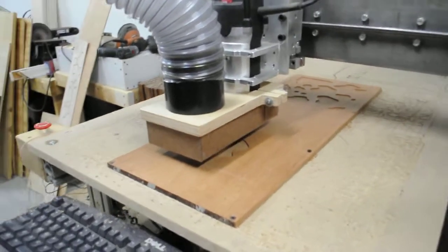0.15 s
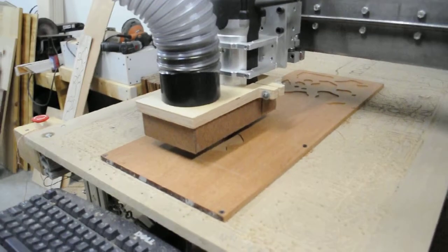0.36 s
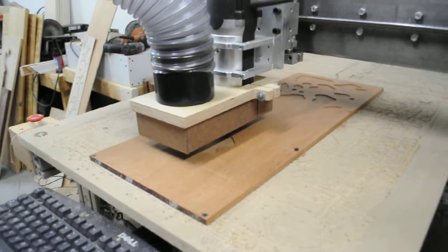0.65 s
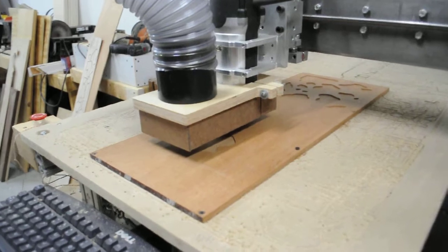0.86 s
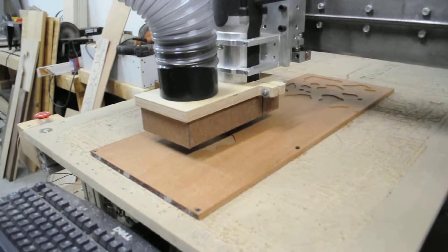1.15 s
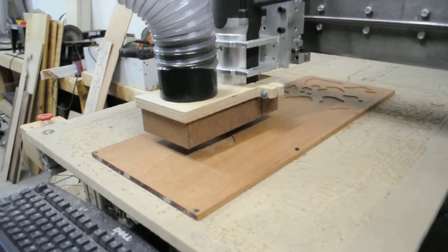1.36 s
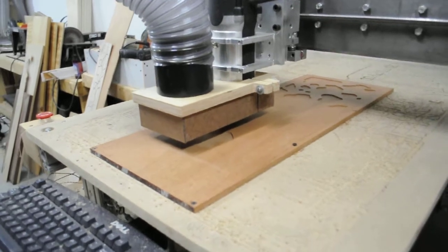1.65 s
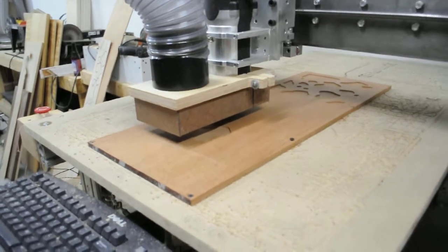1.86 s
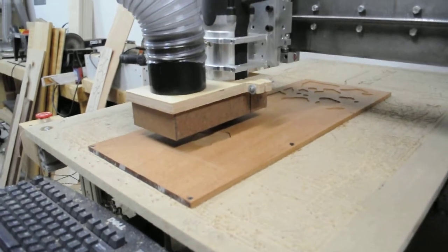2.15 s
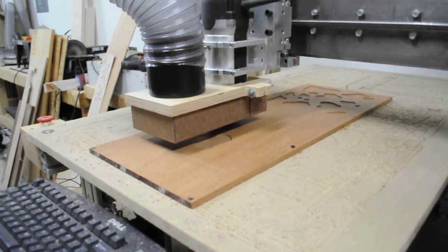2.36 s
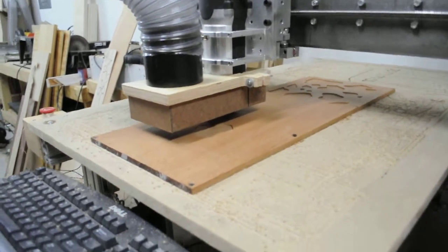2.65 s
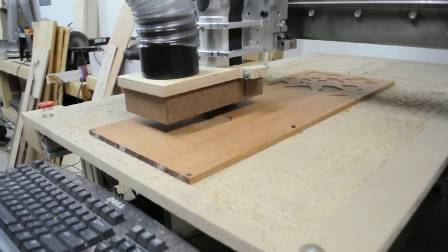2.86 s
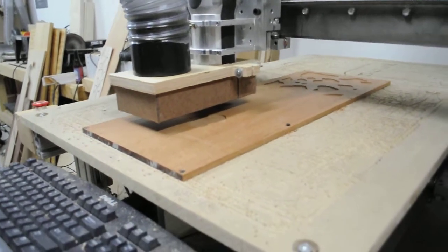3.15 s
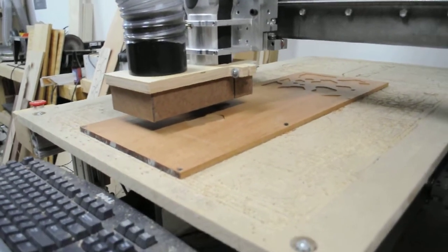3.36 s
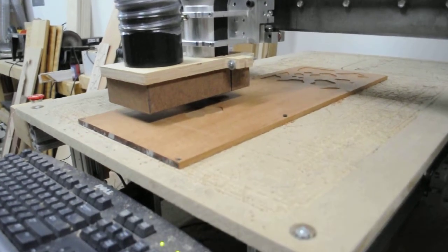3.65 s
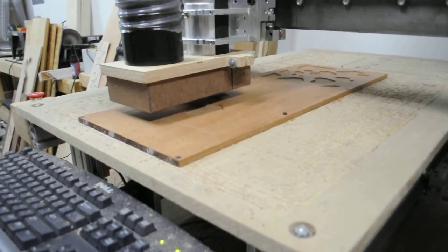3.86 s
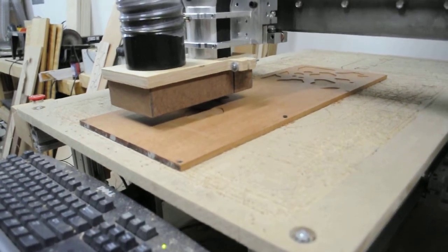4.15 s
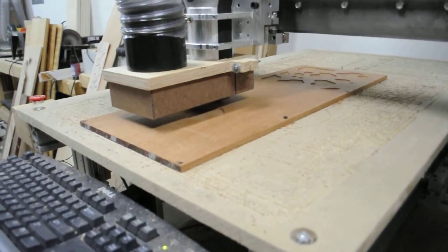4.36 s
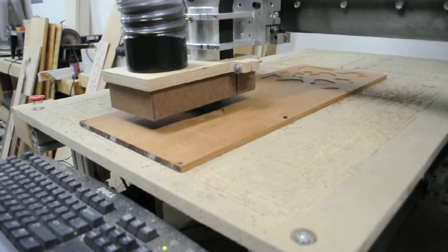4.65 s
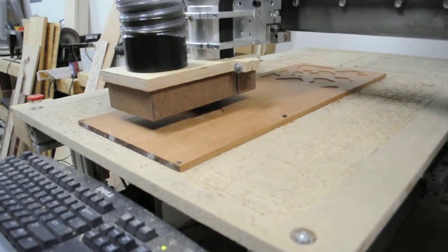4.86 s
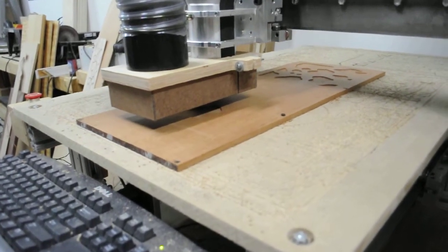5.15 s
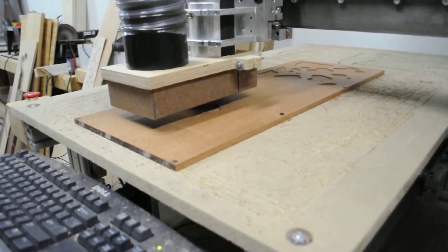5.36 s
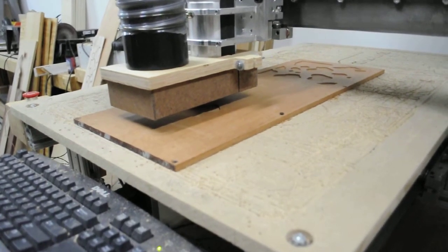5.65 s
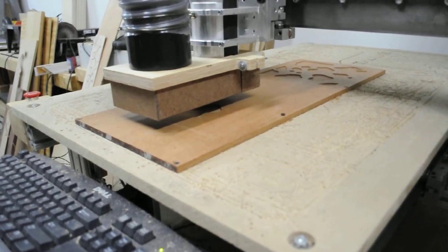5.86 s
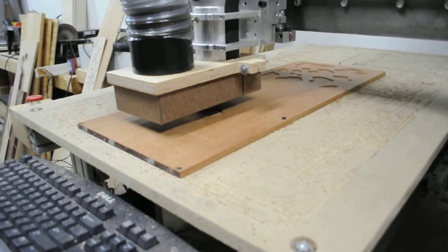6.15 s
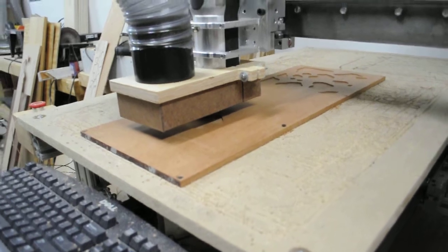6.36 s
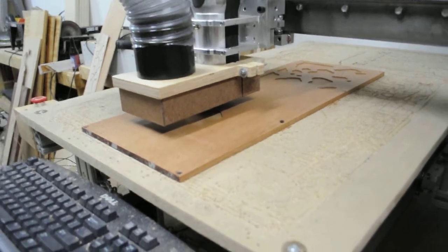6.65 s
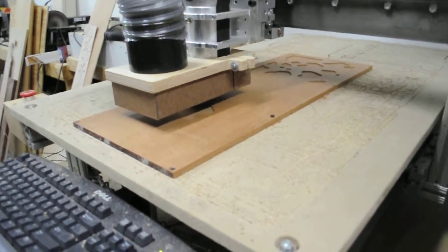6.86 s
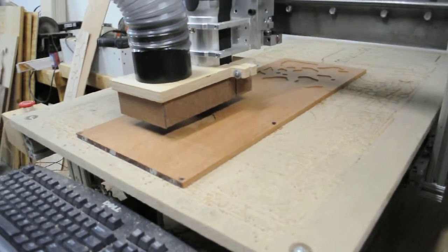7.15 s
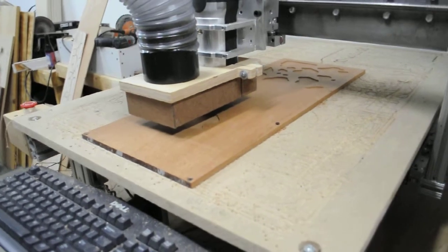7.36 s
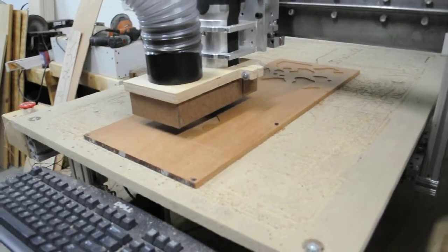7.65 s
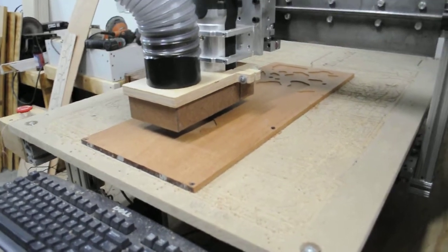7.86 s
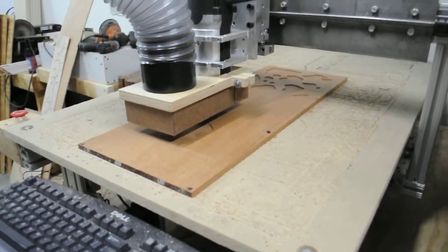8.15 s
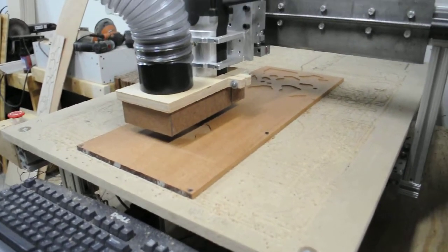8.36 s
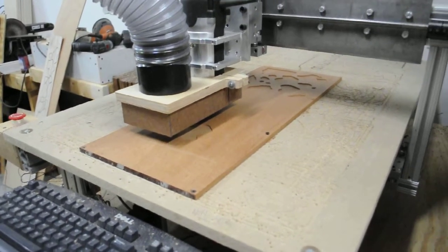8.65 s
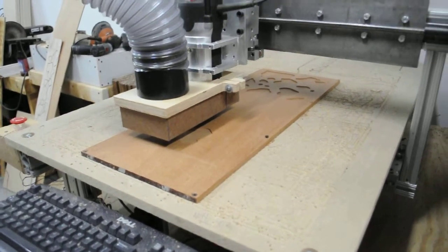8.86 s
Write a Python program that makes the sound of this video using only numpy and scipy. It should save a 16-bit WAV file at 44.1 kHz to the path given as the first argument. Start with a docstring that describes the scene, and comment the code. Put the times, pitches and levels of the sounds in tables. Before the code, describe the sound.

In a workshop, a router cuts a wooden sheet without pause. Its bit gives a shrill, rough chatter and squeal over a buzzing whine, with dense noise of tearing chips. Behind it a dust extractor hums low and steadily, with a hollow roar of air in the hose. One close, small mono microphone overloads, flattening the sound; treble is dulled and no echo is heard.

```python
"""A router bit whines, chatters and squeals through a wooden sheet, spinning near 22000 rpm; chips tear off.
Behind it a seven-blade dust extractor hums steadily, and air roars through the hose.
Sines locked to the spindle and the fan shaft make the whine and hum; chips, air and squeal are shaped noise.
All sources meet at one small microphone, in mono, with no room echo or distance modelled.
Its signal overloads in a slow converter, and its treble is cut."""
import sys
import numpy as np
from scipy import signal
from scipy.fft import rfft, irfft
from scipy.io import wavfile
from scipy.ndimage import uniform_filter1d

SR = 44100
rng = np.random.default_rng(int(sys.argv[2]) if len(sys.argv) > 2 else 0)


def wrap_up_sound(samples):
    """Save the sound to the file named by the first command line argument, as 16-bit audio."""
    columns = np.atleast_2d(samples).T
    # keep every value between -1 and 1, then stretch to whole-number steps
    tamed = np.clip(columns, -1, 1)
    steps = np.round(tamed * 32767).astype(np.int16)
    wavfile.write(sys.argv[1], SR, steps)


N = 397782  # samples, about 9 s

# Levels in every table come before the recorder.
# Extractor shaft harmonics: harmonic, level_db (rms)
FAN_HARMONICS = [(1, -30), (2, -35.5), (3, -32), (4, -25), (5, -35), (6, -32.5), (8, -44), (9, -42.5)]
# Blade-pass tone of the extractor: time_s, level_db (rms)
BLADE_TONE = [(0.0, -19), (0.63, -19), (1.56, -20.5), (1.63, -20.5), (1.71, -21), (2.76, -22),
              (2.81, -24.5), (2.96, -18), (3.14, -23.5), (7.21, -23), (7.36, -18), (7.94, -19.5),
              (8.87, -18.5), (9.02, -19)]
# Colour of the air roar: freq_hz, density_db (per Hz, relative)
AIR_COLOUR = [(24, -33), (45, -10), (80, -13.5), (134, -9), (227, 0.5), (325, 2), (467, -0.5), (623, -4),
              (800, -4.5), (1100, -6), (1570, -10.5), (3000, -5), (4500, -38.5)]
# Hose resonances: freq_hz, width_hz, level_db (rms)
HOSE_RESONANCES = [(125, 27, -37), (207.8, 27, -31), (282.5, 15, -32.5), (485.4, 12, -36), (859, 50, -35.5)]
# Short high tones, cause uncertain, some probably side lines of the chatter:
# start_s, end_s, pitch_hz, level_db (rms)
STEADY_TONES = [(0, 0.287, 2440, -29), (0.686, 0.926, 3330, -24), (1.034, 1.222, 3400, -28),
                (1.32, 1.62, 4470, -26.5), (1.32, 1.78, 4560, -25.5), (1.498, 1.808, 2900, -25.5),
                (2.095, 2.4, 2836, -29), (3.897, 4.7, 2071, -32), (4.098, 4.395, 4470, -33.5),
                (4.502, 4.895, 2881, -28), (5.094, 5.295, 4390, -29.5), (5.555, 5.8, 1243, -30.5),
                (5.572, 5.714, 3300, -27.5), (5.796, 6.694, 2365, -32), (5.897, 6.122, 4390, -25),
                (6.2, 6.448, 3470, -29), (7.601, 8.103, 2400, -29.5)]
# Rough squeal of the rubbing bit, four bands at rest: pitch_hz, level_db (before SQUEAL_SHARE_DB)
SQUEAL_REST = [(4400, -28), (3830, -29), (2904, -25.5), (2332, -31.5)]
# Where a squeal band swells: start_s, end_s, pitch_hz, level_db (before SQUEAL_SHARE_DB)
SQUEAL_SWELLS = [(.03, .2, 4340, -23), (.05, 1.0, 3750, -20), (1.3, 1.8, 4500, -17.5),
                 (1.3, 1.82, 3661, -15.5), (1.3, 1.75, 2870, -17), (1.85, 2.15, 4400, -21.5),
                 (1.85, 2.15, 3970, -18), (2.2, 2.95, 3920, -22.5), (3.72, 4.8, 4482, -18),
                 (3.781, 5.152, 2301, -23.5), (3.8, 4.9, 3830, -22), (4.8, 5.04, 4470, -15),
                 (5.35, 5.6, 4420, -18.5), (5.82, 6.15, 4530, -20), (5.747, 6.702, 2350, -23.5),
                 (5.8, 6.6, 3680, -22.5), (7.8, 8.9, 2800, -21), (8.0, 8.6, 3920, -20.5),
                 (8.05, 8.6, 4500, -16), (8.62, 9.02, 3930, -19), (8.65, 9.02, 4400, -21.5)]
# Chips tearing off: time_s, level_db (before pulsing), brightness_db (gain of the treble)
CHIP_LEVELS = [(0, -15, -4.5), (.8, -20.5, 2), (2.0, -15, -2), (2.2, -18, -2.5), (2.9, -20, 2.5),
               (3.1, -21, -3.5), (3.5, -17.5, -1.5), (3.74, -20.5, -1), (3.82, -13.5, -5.5),
               (3.93, -17.5, -4), (4.05, -14.5, -4.5), (5.1, -17, -2.5), (5.4, -19, 0), (5.6, -16.5, -1),
               (6.3, -16, -2), (7.5, -18.5, -2.5), (7.75, -18, -1), (8.7, -15, -5.5), (9.02, -16, -0.5)]
# Colour of the tearing noise: freq_hz, density_db (per Hz, relative)
CHIP_SPECTRUM = [(700, -22), (1200, -11), (2000, -8), (2400, -4), (2900, -2), (3450, -1.5), (4300, -2),
                 (4700, -9), (5200, -5.5), (6000, -14.5), (9000, -33)]
# Bouts in which the bit vibrates on its own, chopped by the turns into side lines:
# start_s, end_s, start_pitch_hz, end_pitch_hz, lower_sides_db, centre_db, half_turn_sides_db, upper_side_db
CHATTER_BOUTS = [(0, 0.202, 4232, 4236, -29, -22, -37, -23.5),
                 (0.222, 0.499, 4242, 4250, -27.5, -21, -32, -34),
                 (0.522, 1.02, 4264, 4279, -30, -29.5, -25.5, -34),
                 (1.039, 1.35, 4295, 4336, -33, -20, -22, -29.5),
                 (1.6, 1.901, 4255, 4260, -34, -26, -31, -42), (1.92, 2.09, 4339, 4338, -23, -38, -24, -39),
                 (2.11, 2.5, 4267, 4266, -26.5, -28, -26.5, -28.5),
                 (2.749, 2.95, 4190, 4178, -33, -23, -27.5, -45),
                 (3.55, 3.74, 4340, 4328, -30.5, -26, -36, -26),
                 (3.799, 3.983, 4180, 4196, -28, -43, -38, -28),
                 (4.0, 4.299, 4217, 4200, -28, -40, -45, -23),
                 (4.321, 4.901, 4209, 4193, -29, -38.5, -40, -26),
                 (5.178, 5.33, 4232, 4254, -29, -29.5, -27.5, -46),
                 (5.35, 5.431, 4340, 4347, -40, -20.5, -31, -36.5),
                 (5.449, 5.592, 4320, 4370, -33.5, -18, -21, -23.5),
                 (5.609, 5.693, 4375, 4340, -26, -21.5, -29, -32),
                 (5.71, 5.842, 4335, 4320, -23, -36, -27.5, -22.5),
                 (5.858, 6.181, 4302, 4266, -34, -27.5, -33, -22.5),
                 (6.203, 6.593, 4211, 4270, -28, -27, -37.5, -21.5),
                 (6.611, 6.894, 4260, 4266, -30, -24, -38, -21),
                 (6.897, 7.189, 4256, 4220, -29.5, -31, -26.5, -26),
                 (7.209, 7.483, 4276, 4284, -25.5, -33, -27.5, -43),
                 (7.509, 7.708, 4249, 4309, -24.5, -26, -39, -24),
                 (7.725, 8.092, 4258, 4312, -25.5, -24, -42.5, -23),
                 (8.113, 8.349, 4318, 4347, -25, -28.5, -38, -42),
                 (8.401, 8.598, 4225, 4232, -27.5, -37, -27.5, -28),
                 (8.661, 8.815, 4283, 4423, -20.5, -20.5, -29, -51),
                 (8.879, 9.032, 4280, 4350, -32, -33, -24.5, -42.5)]
# As the bit moves on, the sheet lets one harmonic of the turns or another sing out:
# start_s, end_s, harmonic, level_db (rms)
WHINE_BOUTS = [(0, 0.147, 7, -31.5), (0.094, 0.402, 6, -28.5), (0, .65, 9, -26.5), (0.055, 0.34, 8, -23),
               (.35, .95, 5, -34), (0.409, 0.684, 6, -26), (0.449, 0.791, 8, -25.5),
               (0.598, 1.05, 4, -34.5), (.65, 1.0, 9, -26), (0.949, 1.308, 8, -24), (1.043, 1.199, 7, -29),
               (1.05, 1.305, 9, -25), (1.55, 1.7, 8, -26), (2.07, 2.38, 5, -24.5), (2.073, 2.225, 6, -18),
               (2.1, 2.207, 7, -24), (2.22, 2.4, 6, -28.5), (2.2, 2.498, 8, -28.5),
               (2.349, 3.204, 7, -25.5), (2.41, 2.58, 5, -22.5), (2.581, 2.954, 5, -29),
               (2.396, 2.895, 6, -23.5), (2.546, 2.902, 8, -23.5), (2.602, 3.602, 4, -31),
               (2.913, 3.6, 6, -30), (2.97, 3.629, 8, -22.5), (2.95, 3.498, 5, -32),
               (3.297, 3.556, 7, -26.5), (3.848, 4.952, 7, -27), (4.403, 5.102, 9, -31), (5.3, 5.8, 8, -34),
               (5.713, 5.942, 5, -32), (5.88, 6.203, 6, -24.5), (5.696, 6.694, 7, -35.5),
               (5.88, 6.12, 9, -23), (6.198, 6.854, 9, -26), (6.451, 7.55, 4, -34.5), (6.55, 6.799, 6, -27),
               (6.601, 6.883, 8, -30), (6.883, 7.051, 8, -20.5), (6.895, 7.344, 6, -31),
               (6.95, 7.197, 5, -26), (6.998, 7.348, 9, -26.5), (7.152, 7.321, 8, -23.5),
               (7.422, 7.58, 8, -23.5), (7.2, 7.45, 5, -37), (7.396, 8.045, 9, -27), (7.802, 8.05, 6, -33)]
# Spindle speed, slower under load: time_s, speed_hz (turns per second)
SPINDLE_SPEED = [(0, 361.7), (.55, 367.1), (1.15, 364.9), (1.65, 365), (2.05, 366.4), (2.42, 365.2),
                 (2.6, 367.7), (2.95, 366.5), (3.62, 366.6), (3.8, 361), (4.75, 361.1), (5.6, 365.5),
                 (5.9, 364.2), (6.14, 364.3), (6.25, 361.2), (6.55, 361.3), (7.1, 364.8), (7.27, 367.8),
                 (7.45, 367.6), (7.65, 364.4), (8.4, 364.4), (9.02, 367.9)]
# Roll-off of the recorder: freq_hz, gain_db
RECORDER_RESPONSE = [(20, -16.5), (45, -10.5), (70, -1.5), (4700, -1), (5250, -5), (5510, -10), (5750, -16),
                     (6000, -25.5), (6120, -30.5), (6300, -41.5), (6500, -61)]

SHAFT_HZ, BLADE_COUNT = 58.98, 7
BLADE_FLUTTER_DB, AIR_DB = 1.5, -20
SQUEAL_WIDTH_HZ, SQUEAL_SHARE_DB = 80, -5.5
CHATTER_WOBBLE_HZ, CHATTER_REST_DB = 9.16, -34
SPINDLE_WOBBLE_HZ = 0.52
SPINDLE_DB, SECOND_DB = -37, -41.5  # whine harmonics 1 and 2
HALF_TURN_DB = -15  # lines halfway between harmonics, relative to the harmonic below
WHINE_REST_DB, WHINE_FLUTTER_DB = -41.5, 2.5
FADE_S = .04  # soft edge of each bout
DRIVE_DB, TOP = 9, 0.34  # overload: gain into the limit, and the limit as amplitude
BASS_CUT_HZ, CUTOFF_HZ = 260, 6800


def from_db(db):
    """Decibels to amplitude factor."""
    return 10 ** (np.asarray(db) / 20)


def rms_one(x):
    """Scale a signal to rms 1."""
    return x / np.sqrt(np.mean(x ** 2) + 1e-20)


def in_time(rows):
    """Straight lines between timed rows, one curve for each column after the time."""
    time_s, *columns = np.transpose(rows)
    return [np.interp(np.arange(N) / SR, time_s, column) for column in columns]


def held(rows, rest):
    """Each (start, end, value) holds between soft edges; elsewhere the resting value."""
    out = np.full(N, float(rest))
    for start, end, value in rows:
        out[max(int(start * SR), 0):int(end * SR)] = value
    return uniform_filter1d(out, int(FADE_S * SR))


def drift(rate_hz):
    """Slow chance: noise twice through a one-pole low-pass, run in; rms about 1."""
    step = 40  # samples between computed points
    r = np.exp(-2 * np.pi * rate_hz * step / SR)
    noise = rng.standard_normal(N // step + 2002)
    slow = signal.lfilter([1], [1, -2 * r, r * r], noise)[2000:]
    return np.interp(np.arange(N) / step, np.arange(len(slow)), rms_one(slow))


def turns(hz):
    """Running phase in radians."""
    return 2 * np.pi * np.cumsum(hz) / SR


def tone(phase, db, flutter_db, rate):
    """A sine whose rms level flutters around db."""
    amplitude = np.sqrt(2) * from_db(db + flutter_db * drift(rate))
    return amplitude * np.sin(phase + rng.uniform(0, 2 * np.pi))


def shaped(x, spectrum):
    """Colour a sound by a table of (Hz, dB), interpolated over log frequency."""
    hz, db = np.transpose(spectrum)
    bins_hz = np.maximum(np.arange(N // 2 + 1) * SR / N, 1)
    gain = from_db(np.interp(np.log(bins_hz), np.log(hz), db))
    return irfft(rfft(x) * gain, N)


def coloured(spectrum):
    """Steady noise with this spectrum; rms 1."""
    return rms_one(shaped(rng.standard_normal(N), spectrum))


def hose():
    """Noise through two-pole resonators: the hose colours the moving air at its own pitches."""
    out = np.zeros(N)
    for hz, width_hz, db in HOSE_RESONANCES:
        r = np.exp(-np.pi * width_hz / SR)
        poles = [1, -2 * r * np.cos(2 * np.pi * hz / SR), r * r]
        rung = signal.lfilter([1, 0, -1], poles, rng.standard_normal(N))
        out += from_db(db) * rms_one(rung)
    return out


def extractor(shaft):
    """Shaft harmonics, the blade-pass tone, air roar throbbing with the shaft, and hose resonances."""
    hum = sum(tone(round(k) * shaft, db, flutter_db=1.5, rate=3.8) for k, db in FAN_HARMONICS)
    blade_db, = in_time(BLADE_TONE)
    blades = tone(BLADE_COUNT * shaft, blade_db, flutter_db=BLADE_FLUTTER_DB, rate=5)
    throb = 1 + 0.025 * np.cos(shaft)
    roar = from_db(AIR_DB) * coloured(AIR_COLOUR) * throb
    return hum + blades + roar + hose()


def steady_tones():
    """Short, slightly wavering high sines, cause uncertain; each fades in and out quickly."""
    t, out = np.arange(N) / SR, 0
    for start, end, hz, db in STEADY_TONES:
        fade = np.clip(np.minimum(t - start, end - t) / 0.026, 0, 1)
        phase = turns(hz + 4.0 * drift(15))
        out = out + fade * tone(phase, db, flutter_db=3.0, rate=15)
    return out


def squeal():
    """Narrow bands of noise that wander in pitch and level; a swell takes over the band nearest to it."""
    out, centres = 0, np.transpose(SQUEAL_REST)[0]
    for k, (rest_hz, rest_db) in enumerate(SQUEAL_REST):
        swells = [row for row in SQUEAL_SWELLS if np.argmin(abs(centres - row[2])) == k]
        hz = held([(start, end, hz) for start, end, hz, _ in swells], rest_hz)
        db = held([(start, end, db) for start, end, _, db in swells], rest_db)
        phase = turns(hz + 30 * drift(4))
        # slow noise on a carrier becomes a narrow band around it
        band = drift(SQUEAL_WIDTH_HZ) * np.cos(phase) + drift(SQUEAL_WIDTH_HZ) * np.sin(phase)
        out = out + from_db(db + 2.0 * drift(12) + SQUEAL_SHARE_DB) * band
    return out


def chips(turn, shaft):
    """Tearing noise, pulsing with each turn and throbbing slightly at the fan shaft rate."""
    level_db, bright_db = in_time(CHIP_LEVELS)
    noise = coloured(CHIP_SPECTRUM)
    dull = shaped(noise, [(3200, 0), (3600, -30.5)])
    treble = noise - dull
    # the treble level follows the brightness column over time
    noise = dull + treble * from_db(bright_db)
    pulse = (1 + .6 * np.cos(turn)) * (1 + .2 * np.cos(shaft))
    return from_db(level_db + 2.1 * drift(8.7)) * noise * pulse


def chatter(turn):
    """The bit's own unsteady high vibration, with side lines whole and half turns away."""
    start, end, hz_start, hz_end, *levels_db = np.transpose(CHATTER_BOUTS)
    lower, centre, half, upper = [held(zip(start, end, db), CHATTER_REST_DB) for db in levels_db]
    hz, = in_time(sorted([*zip(start, hz_start), *zip(end, hz_end)]))
    own = turns(hz + CHATTER_WOBBLE_HZ * drift(24.67))
    # distance from the centre in half turns, and level; paired lines share their power
    lines = [(-3, lower - 3), (-2, lower - 3), (-1, half - 3), (0, centre),
             (1, half - 3), (2, upper), (4, upper - 9)]
    return sum(tone(own + n * turn / 2, db, flutter_db=3.0, rate=17) for n, db in lines)


def whine(turn):
    """Every turn strikes the wood alike; a slight two-turn pattern adds faint half lines."""
    out = tone(turn, SPINDLE_DB, flutter_db=3.5, rate=10)
    out += tone(2 * turn, SECOND_DB, flutter_db=5.5, rate=3)
    for k in sorted({round(row[2]) for row in WHINE_BOUTS}):
        bouts = [(start, end, db) for start, end, n, db in WHINE_BOUTS if round(n) == k]
        db = held(bouts, WHINE_REST_DB)
        out += tone(k * turn, db, flutter_db=WHINE_FLUTTER_DB, rate=13)
        out += tone((k + .5) * turn, db + HALF_TURN_DB, flutter_db=3.5, rate=7.3)
    return out


def scene():
    """Extractor and short tones with the cutting bit; one spindle phase drives whine, chatter and chips."""
    turn = turns(in_time(SPINDLE_SPEED)[0] + SPINDLE_WOBBLE_HZ * drift(13.5))
    shaft = turns(SHAFT_HZ + 0.041 * drift(0.54))
    bit = squeal() + chips(turn, shaft) + chatter(turn) + whine(turn)
    return (extractor(shaft) + steady_tones() + bit)[None]


def record(dry):
    """A slow converter, a quarter of the playback rate, overloads; treble mirrors faintly above half its rate."""
    lowpass = signal.butter(8, 5300, fs=SR, output="sos")
    sound = signal.sosfilt(lowpass, dry)
    drive = from_db(DRIVE_DB) * sound[:, ::4] / TOP
    limited = TOP * drive / (1 + np.abs(drive) ** 3.0) ** (1 / 3.0)
    # zeros between the slow samples leave the mirror image; 4 restores the level
    played = np.zeros_like(dry)
    played[:, ::4] = 4 * limited
    # coupling capacitor: flat tops sag
    coupling = signal.butter(1, BASS_CUT_HZ, "high", fs=SR, output="sos")
    played = shaped(signal.sosfilt(coupling, played), RECORDER_RESPONSE)
    treble_cut = signal.cheby2(12, 40, CUTOFF_HZ, fs=SR, output="sos")
    return signal.sosfiltfilt(treble_cut, played)


dry = scene()
out = record(dry)
wrap_up_sound(out)
```